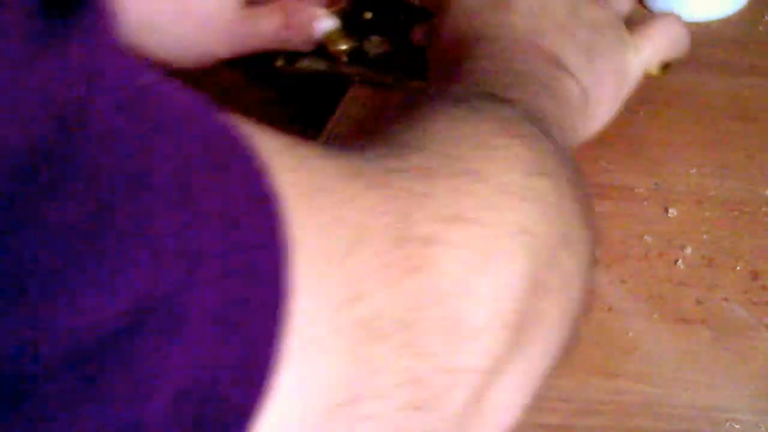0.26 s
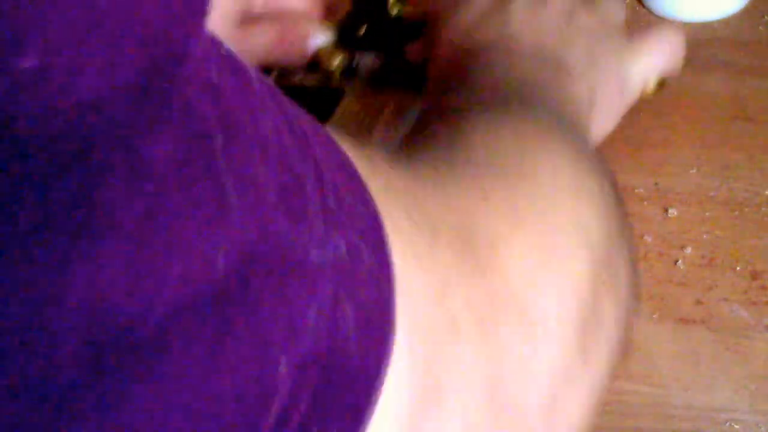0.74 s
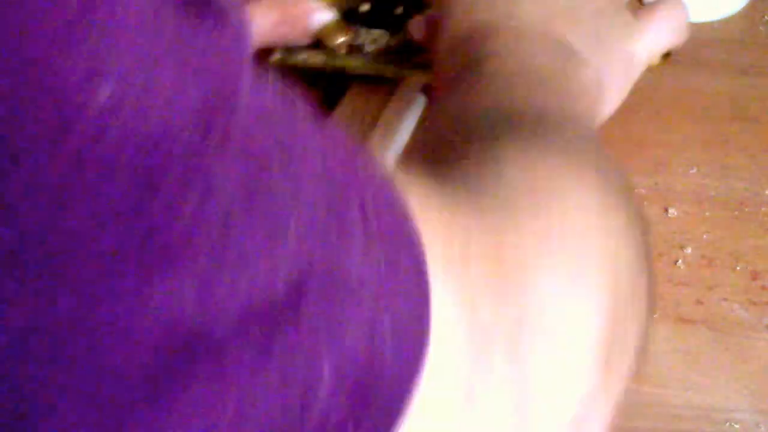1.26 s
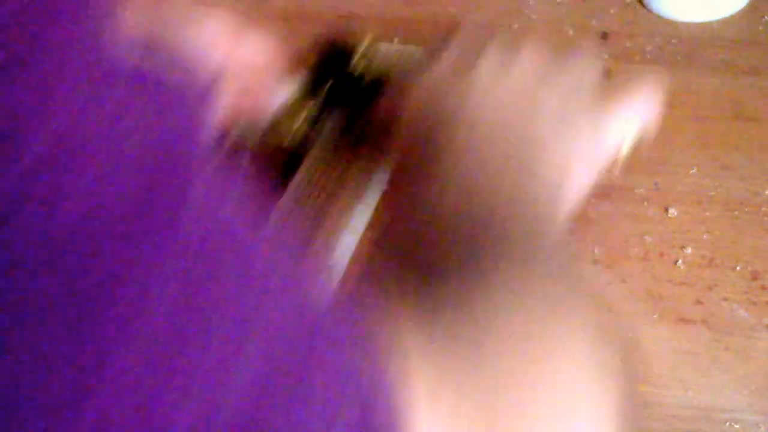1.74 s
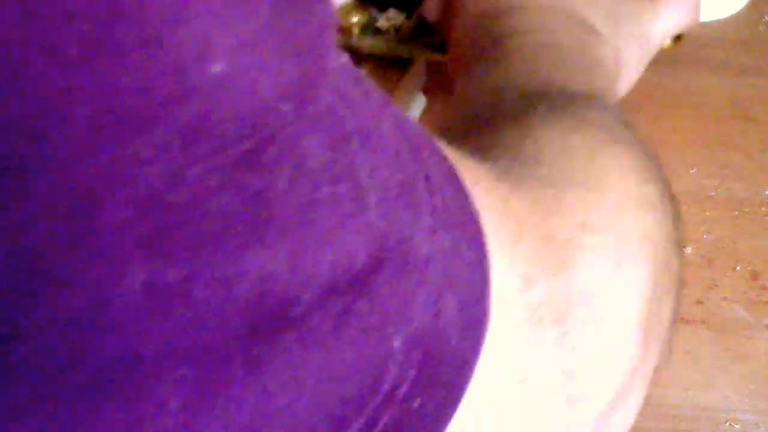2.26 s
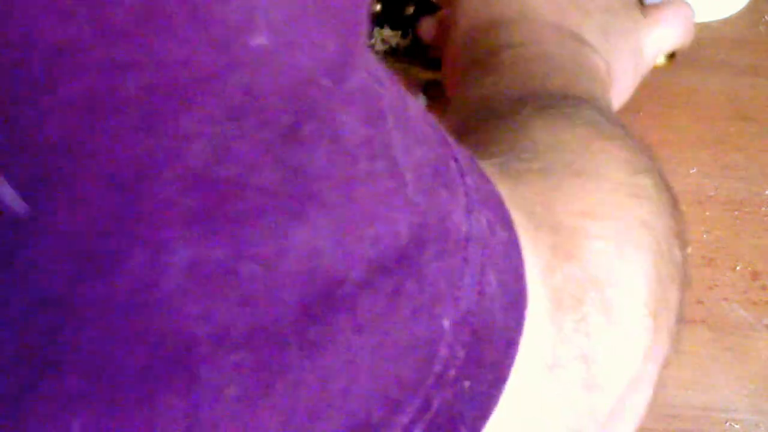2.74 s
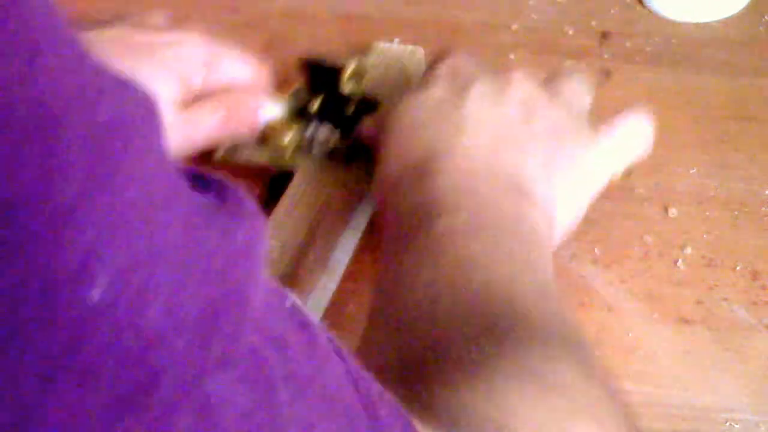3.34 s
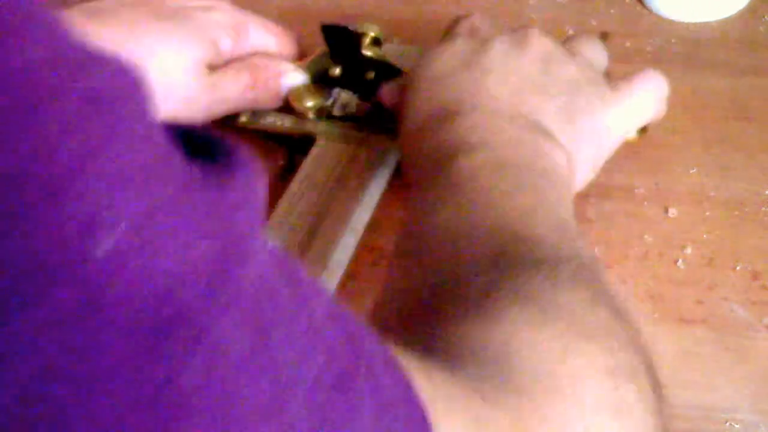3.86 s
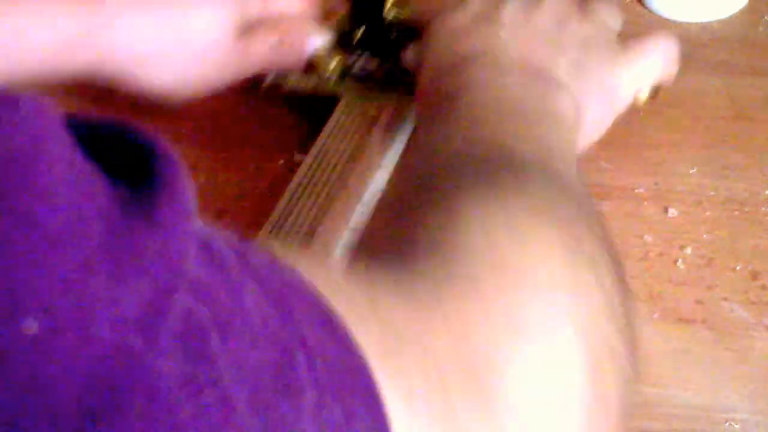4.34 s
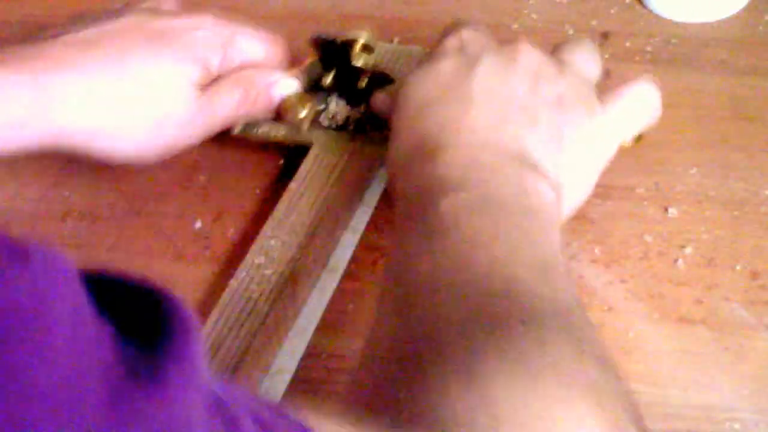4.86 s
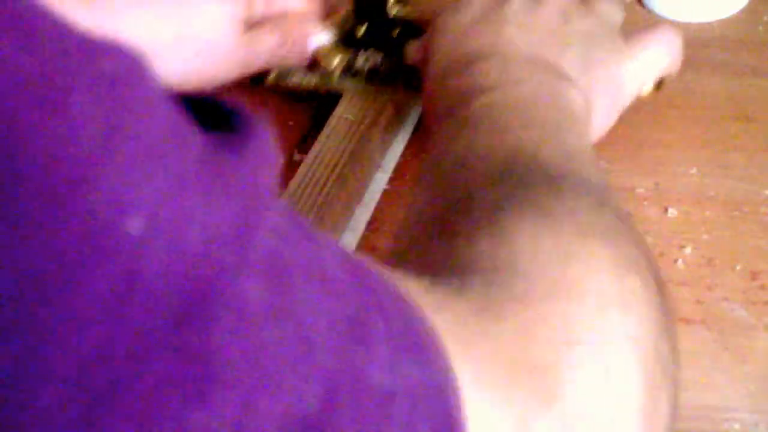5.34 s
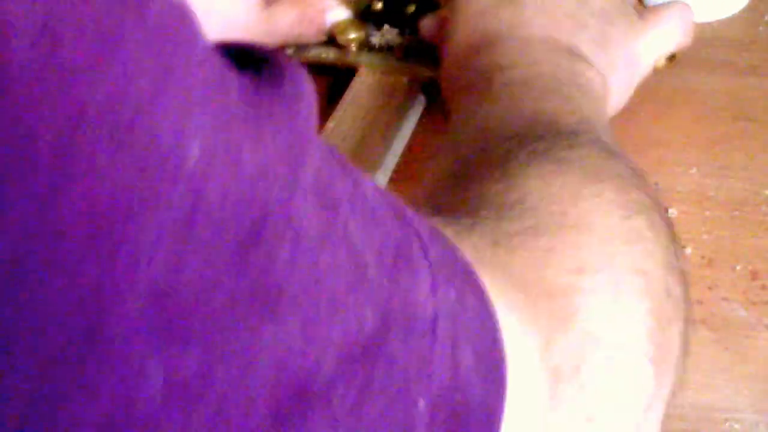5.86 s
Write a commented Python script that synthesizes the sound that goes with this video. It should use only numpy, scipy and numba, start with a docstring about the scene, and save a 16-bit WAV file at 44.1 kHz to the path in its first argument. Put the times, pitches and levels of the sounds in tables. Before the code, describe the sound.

Separate, uneven scraping strokes on wood, heard close, with faint background hiss in the gaps. Two strong rasps come first with hard woody knocks and short groans; after a pause and small steel clicks, another stroke leads into a stuttering squeal. A further scrape ends in a loud metallic snap, then shorter, brighter scrapes and dull thumps continue with a short room ring.

```python
"""Scraping a strip of wood

A small steel scraper is pushed along a strip of wood held on a workbench, in a small room that rings.
Filtered noise makes the hiss of the sole, uneven grains tear the fibres, and slips make the bench judder.
Sudden contacts excite the bench and the steel as knocks and clicks; wavering sines hum, groan and squeal.
Once the blade chatters and squeals, once it catches with a snap."""
import sys
import numpy as np
from scipy import signal
from scipy.fft import rfft, irfft
from scipy.io import wavfile
from scipy.ndimage import uniform_filter1d
from numba import njit

SR = 44100
rng = np.random.default_rng(int(sys.argv[2]) if len(sys.argv) > 2 else 0)


def output_pcm(signal):
    """Save a mono or channel-first signal as 16-bit PCM at the path in sys.argv[1].

    Samples are clipped to [-1, 1] before scaling.
    """
    pcm = np.clip(np.atleast_2d(signal).T, -1, 1) * 32767
    wavfile.write(sys.argv[1], SR, np.round(pcm).astype(np.int16))


N = 269010  # length in samples
TIME = np.arange(N) / SR  # seconds


def undb(db):
    """Decibels to gain."""
    return 10 ** (np.asarray(db) / 20)


def unit(x):
    """Scale to rms 1."""
    return x / np.sqrt(np.mean(x ** 2))


def join(tables, column):
    """Draw one column of several tables as a continuous curve over time."""
    rows = np.vstack(tables)
    return np.interp(TIME, rows[:, 0], rows[:, column])


def loudness(tables):
    """Gain from the dB column of each table, silent between them."""
    inside = sum((TIME >= rows[0][0]) & (TIME <= rows[-1][0]) for rows in tables)
    soft_gate = uniform_filter1d(np.minimum(inside, 1.), size=128)
    return soft_gate * undb(join(tables, 1))


def envelope(start, rise, length, fade_db_per_s):
    """Rise, hold until the length is over, then fade evenly in dB."""
    age = TIME - start
    fade_db = -fade_db_per_s * np.clip(age - length, 0, 2)
    return np.clip(age / rise, 0, 1) * undb(fade_db)


def ring(x, response):
    """Pass a sound through an impulse response."""
    return signal.fftconvolve(x, response)[:len(x)]


def colour(points, size=2048):
    """Causal response of unit energy with the given spectrum."""
    hz, db = np.transpose(points)
    bins = np.log(np.fft.rfftfreq(size, 1 / SR) + 1)
    log_gain = np.log(undb(np.interp(bins, np.log(hz), db)))
    # folding the cepstrum forward in time puts the energy at the start
    cepstrum = irfft(log_gain)[:size // 2]
    cepstrum[1:] *= 2
    response = irfft(np.exp(rfft(cepstrum, size)))
    return response / np.linalg.norm(response)


@njit
def svf(x, hz, width):
    """State-variable band-pass whose centre and width may move."""
    y, band_state, low_state = np.empty(len(x)), 0., 0.
    for i in range(len(x)):
        g = np.tan(np.pi * min(hz[i] / SR, .45))
        k = width[i] / hz[i]
        v = (band_state + g * (x[i] - low_state)) / (1 + g * (g + k))
        band_state = 2 * v - band_state
        low_state += 2 * g * v
        y[i] = k * v
    return y


def band(x, hz, width):
    """One resonance, gain 1 at its centre."""
    steady = np.zeros(len(x))
    return svf(x + 1e-18, hz + steady, width + steady)


def walk(rate):
    """Smooth chance with rms 1, drawn anew about rate times per second."""
    hold = max(int(SR / rate), 1)
    steps = np.repeat(rng.standard_normal(N // hold + 1), hold)
    return unit(uniform_filter1d(steps, hold)[:N])


def grains(rate, spread_db):
    """Tiny fractures at random moments and of very uneven size."""
    happens = rng.random(N) < rate / SR
    sign = rng.choice([-1, 1], N)
    size = undb(spread_db * np.minimum(rng.exponential(size=N), 4))
    return unit(happens * sign * size)


def slips(rate, uneven):
    """Stick and slip: the phase of each cycle, and a pulse where it lets go."""
    phase = np.cumsum(rate * np.exp(uneven * walk(170)) / SR) % 1
    lets_go = np.diff(phase, prepend=0) < 0
    return phase, lets_go * undb(4.1 * walk(300))


def add(track, s, sound, db):
    """Place a sound at a time with the given peak level."""
    start = int(s * SR)
    scaled = sound * undb(db) / np.abs(sound).max()
    track[start:start + len(sound)] += scaled[:N - start]


# how long the room rings at each pitch: pitch_hz, time_to_fall_60_db_s
ROOM_DECAY = [(150, 0.5), (400, 0.32), (1000, 0.28), (2500, 0.4), (5000, 0.18), (10000, 0.12)]


def room(x, wet_db, size=26000):
    """Dense reflections of a small room, with its own dying time for each range of pitch."""
    t, hz = np.arange(size) / SR, np.fft.rfftfreq(size, 1 / SR)
    centres, t60s = np.transpose(ROOM_DECAY)
    noise = rfft(rng.standard_normal(size))
    shares = [np.interp(np.log(hz + 1), np.log(centres), row) for row in np.eye(len(ROOM_DECAY))]
    tail = sum(irfft(noise * share) * undb(-60 * t / t60) for share, t60 in zip(shares, t60s))
    tail *= np.minimum(t / 0.0037, 1)
    return x + undb(wet_db) * ring(x, tail / np.linalg.norm(tail))


# colour of the background hiss and of the swish: pitch_hz, level_db (per Hz)
AIR_SPECTRUM = [(18, -95), (30, -28), (174, -4.5), (204, 1.5), (372, -5), (510, -1), (699, -4.5), (885, -5),
                (2810, -7.5), (3120, -7.5), (4620, -14.5), (5130, -9), (6670, -21), (10400, -25),
                (15900, -38)]
STILL_DB = -51  # background hiss


def air():
    """Faint background noise whose level slowly wavers."""
    hiss = unit(ring(rng.standard_normal(N), colour(AIR_SPECTRUM)))
    return hiss * undb(STILL_DB + 3.3 * walk(11))


# low notes of the bench that hum: pitch_hz, level_db (relative to the drive)
HUM_NOTES = [(132, -10), (267, -9.5), (343, -11)]
HUM_SKIP_DB, HUM_KNOCK_DB = -15.5, -37  # drive by the skipping blade, and most that a knock can give
HUM_FADE_DB_PER_S = 157


def hum():
    """Pushes, skips and knocks leave the low resonances of the bench humming."""
    drive = sum(undb(judder_db - 4) * envelope(start, rise, length, HUM_FADE_DB_PER_S)
                for start, rise, length, _, _, judder_db, _, _ in PUSHES_ALONG)
    drive += sum(undb(db + HUM_SKIP_DB) * envelope(start, rise, length, fade)
                 for start, rise, length, db, _, fade in SKIP_RUNS)
    from_knocks = [undb(HUM_KNOCK_DB) * envelope(s, 0.0094, 0.08, HUM_FADE_DB_PER_S) * min(undb(db + 19.5), 1)
                   for s, db, *_ in BLOWS]
    drive += np.max(from_knocks, axis=0)
    notes = 0
    for hz, db in HUM_NOTES:
        angle = 2 * np.pi * np.cumsum(hz * (1 + 0.0252 * walk(70))) / SR
        notes += undb(db + 2.74 * walk(14)) * np.sin(angle)
    return drive * notes


# the strip sticks and groans at one note of the bench:
# start_s, length_s, pitch_hz (about which it wavers), level_db (before 2.5 dB of gain and the flutter)
GROAN_NOTES = [(0.347, 0.13, 133.3, -36.5), (0.387, 0.15, 229.4, -41.5), (0.919, 0.18, 633.3, -26),
               (1.801, 0.16, 268.8, -24), (3.04, 0.12, 149.3, -26.5), (3.182, 0.13, 266, -21.5),
               (3.64, 0.18, 133.7, -32), (3.775, 0.116, 341.6, -20.5), (4.471, 0.094, 347.6, -26),
               (5.537, 0.11, 261.6, -23)]


def groans():
    """Stick-slip feeds one bench resonance for a moment; its pitch and strength waver."""
    out, drift, flutter = np.zeros(N), walk(70), undb(3.8 * walk(60))
    for start, length, hz, db in GROAN_NOTES:
        span = slice(int(start * SR), int((start + length) * SR))
        angle = 2 * np.pi * np.cumsum(hz * (1 + 0.022 * drift[span])) / SR
        swell = signal.windows.tukey(len(angle), .6)
        out[span] += undb(db + 2.5) * swell * flutter[span] * np.sin(angle)
    return out


# notes of the steel blade and tool body: pitch_hz (about which it shifts), width_hz, level_db (relative)
BLADE_NOTES = [(1065, 50, 6), (1404, 87, -6.5), (1573, 114, -1.5), (1850, 61, -1), (2243, 59, 5.5),
               (2745, 33, -28), (3487, 47, -2), (4430, 73, 0), (4650, 50, 0.5), (5320, 88, -10)]


def blade(x, ring_db):
    """The steel adds its resonances, which shift a little with the grip and the load."""
    modes = 0
    for hz, width, db in BLADE_NOTES:
        mode = undb(db) * band(x, hz * (1 + 0.03 * walk(12)), width)
        modes += mode * undb(2.86 * walk(14))
    return unit(unit(x) + undb(ring_db) * unit(modes))


# the tool is drawn back lightly:
# start_s, length_s, swish_db, drag_db (blade on wood), hiss_db (sole)
DRAWS_BACK = [(-0.1, 0.4, -49, -73, -64), (1.078, 0.26, -50.5, -56.5, -59), (2.043, .8, -48, -67, -89),
              (4.55, 0.39, -48.5, -56, -80), (4.93, .17, -47.5, -40, -53), (5.612, 0.16, -56, -35.5, -56)]
# colour of the blade dragged backwards: pitch_hz, level_db (per Hz)
DRAG_SPECTRUM = [(59, -59), (100, -38), (118, -10), (184, -34), (257, -7.5), (345, -2.5), (462, -11),
                 (764, -15), (814, -15.5), (2370, -15.5), (2800, -22.5), (9070, -29.5), (15000, -38)]
RETURN_RISE_S, RETURN_FADE_DB_PER_S = .08, 128


def returns():
    """Drawing the tool back gives a noise swish, fine grains where the blade rubs, and a sole hiss."""
    swish = unit(ring(rng.standard_normal(N), colour(AIR_SPECTRUM))) * undb(0.45 * walk(9))
    rubbing = ring(grains(rate=6000, spread_db=2.0), colour(DRAG_SPECTRUM))
    drag = blade(rubbing, ring_db=-7) * undb(2 * walk(30))
    hiss = unit(ring(rng.standard_normal(N), colour(SOLE_SPECTRUM)))
    out = np.zeros(N)
    for start, length, swish_db, drag_db, hiss_db in DRAWS_BACK:
        mix = undb(swish_db) * swish + undb(drag_db) * drag + undb(hiss_db) * hiss
        out += mix * envelope(start, RETURN_RISE_S, length, RETURN_FADE_DB_PER_S)
    return out


# notes of the bench with the strip on it: pitch_hz, level_db (relative), time_to_fall_60_db_s
BENCH_NOTES = [(131.15, -10.5, 0.37), (148.3, -22, 0.41), (185.4, -10.5, 0.4), (232, -16, 0.9),
               (265.6, -3, 0.31), (328, -17, 0.6), (348.3, -2.5, 0.18), (379.6, 5, 0.066),
               (440.5, -7, 0.15), (495, -4.5, 0.14), (538, -13, 0.085), (603, 0.5, 0.17),
               (615.7, -15.5, 0.1), (666, -11, 0.29), (687, -2, 0.056), (810, -33, 0.039),
               (1057, -14.5, 0.21), (1104, -20, 0.2)]
# colour of the dull thud: pitch_hz, level_db (per Hz)
THUD_SPECTRUM = [(70, -26), (130, -11), (300, 3.5), (500, 0.5), (720, 0), (950, -9.5), (1400, -19),
                 (3000, -37), (8000, -67)]


def bench_response(ring_db, size=24000):
    """A dull thud together with the ringing modes of the bench."""
    t = np.arange(size) / SR
    modes = sum((-1) ** k * undb(db - 60 * t / t60) * np.sin(2 * np.pi * hz * t)
                for k, (hz, db, t60) in enumerate(BENCH_NOTES))
    thud = colour(THUD_SPECTRUM)
    return np.pad(thud, (0, size - len(thud))) + undb(ring_db) * modes / np.linalg.norm(modes)


# tool and strip knock on the bench: start_s, peak_db (before 0.5 dB of gain),
# crack_db (treble, before 3 dB of gain), thump_db (gain of the thump), thump_pitch_hz
BLOWS = [(0.353, -21, -9.5, 10.5, 215), (0.8194, -7, 0, 11, 600), (0.9302, -5, -4, 7, 595),
         (1.3607, -24.5, -9.5, -15, 400), (1.4335, -11.5, -14, -1, 636), (1.6474, -11, -21.5, 0, 364),
         (1.8056, -5, -8, 6, 646), (2.2569, -21, -16, 9, 324), (2.5763, -11, -16, -2, 570),
         (2.8961, -19.5, -18, -1, 880), (3.052, -13, -6, 12, 220), (3.1421, -6.5, -20, 4, 517),
         (3.221, -14.5, -25, 8, 330), (3.409, -21, 5, 9, 800), (3.7834, -12, -17, 7, 920),
         (3.824, -11.5, -21, 8, 420), (4.244, -22, -18, 24, 214), (4.5064, -14.5, -15, 8.5, 325),
         (4.647, -33.5, -23, 12, 700), (5.3635, -14.5, -18, 12, 340), (5.5411, -7.5, -21, 6, 443),
         (6.048, -9, -15.5, 8, 810)]
# colour of the crack of a hard contact: pitch_hz, level_db (per Hz)
CRACK_SPECTRUM = [(300, -48), (800, 8), (1300, 12), (2000, 8), (3200, 2), (4600, -4), (6500, -21),
                  (10000, -21), (15000, -36)]


def knocks():
    """Each blow rattles briefly and rings the bench, with a thump set by where it lands; hard contact cracks."""
    out, bench = np.zeros(N), bench_response(ring_db=0)
    t = np.arange(len(bench)) / SR
    impulse = signal.unit_impulse(len(t))
    for s, db, hard_db, thump_db, thump_hz in BLOWS:
        rattle = impulse + 0.14 * np.exp(-t / 0.0073) * rng.standard_normal(len(t))
        blow = impulse + 0.053 * np.exp(-t / 0.0079) * rng.standard_normal(len(t))
        body = ring(blow, bench)
        thump = undb(thump_db) * band(body, thump_hz, .5 * thump_hz)
        crack = undb(hard_db + 3.0) * ring(rattle, colour(CRACK_SPECTRUM))
        add(out, s, body + thump + crack, db + 0.5)
    return out


# steel clicks on wood: start_s, peak_db, pitch_hz, width_hz (of the first of two filters)
STEEL_CLICKS = [(2.6897, -13.5, 1420, 1600), (2.6922, -16.5, 2200, 1120), (3.4227, -11, 1630, 605),
                (3.425, -2.5, 1660, 1190), (4.119, -1, 2470, 6160), (4.1204, -13, 5160, 9000),
                (4.1254, -20, 4800, 9020), (4.1372, -34, 5980, 9080)]


def clicks():
    """Short, hard contacts of the steel edge: an impulse and a puff of noise, filtered twice."""
    out, t = np.zeros(N), np.arange(2048) / SR
    for s, db, hz, width in STEEL_CLICKS:
        puff = 0.12 * np.exp(-t / 0.0024) * rng.standard_normal(len(t))
        contact = signal.unit_impulse(len(t)) + puff
        add(out, s, band(band(contact, hz, width), hz, 2 * width), db)
    return out


# the blade skips: start_s, rise_s, length_s, level_db (before a 4.5 dB cut), tick_db, fade_db_per_s
SKIP_RUNS = [(3.44, .018, 0.096, -14, -25, 230), (3.593, 0.033, 0.081, -15.5, -28.5, 167),
             (4.117, 0.0026, 0.0078, -11, -19.5, 750), (4.135, 0.027, 0.056, -19.5, -42, 203)]
# colour of the skipping blade: pitch_hz, level_db (per Hz)
SKIP_SPECTRUM = [(80, -24), (150, -7), (330, 2), (500, -2), (720, 2), (1200, -9.5), (1700, -0.5),
                 (2500, -8.5), (3200, -3), (4000, -3.5), (4700, -3.5), (5600, -10), (8000, -17),
                 (15000, -49)]
SKIPS_PER_S = 145  # roughly, as the pace is uneven
TICKING_SHARE = 0.67  # of a run of skips; then the blade lifts and only the scrape goes on


def chatter():
    """The blade skips over the grain, with a bright tick at every release; its bending modes follow the squeal."""
    phase, _ = slips(rate=SKIPS_PER_S, uneven=.17)
    skipping = (0.85 + np.exp(-phase / 0.19)) * grains(rate=6000, spread_db=2.5)
    scrape = blade(ring(skipping, colour(SKIP_SPECTRUM)), ring_db=-2)
    bend_hz = join(SINGING, 1)
    bending = unit(band(scrape, bend_hz, 540) + 0.36 * band(scrape, 2 * bend_hz, 370))
    tick_noise = (0.077 + np.exp(-phase / 0.24)) * rng.standard_normal(N)
    ticks = unit(ring(tick_noise, colour(SOLE_SPECTRUM)))
    body = undb(-4.5) * unit(scrape + 0.41 * bending)
    out = np.zeros(N)
    for start, rise, length, db, tick_db, fade in SKIP_RUNS:
        out += undb(db) * body * envelope(start, rise, length, fade)
        out += undb(tick_db) * ticks * envelope(start, rise, TICKING_SHARE * length, fade)
    return out


# the blade sings, one list for each squeal:
# time_s, pitch_hz (before wobble), level_db (before 1 dB of gain and flutter), roughness (0 is pure)
SINGING = [
    [(3.432, 2049, -30, 0.4), (3.447, 1932, -12.5, 0.72), (3.47, 1885, -33, 0.86), (3.54, 2034, -26, 1),
     (3.585, 2380, -16.5, 0.4), (3.602, 2254, -13.5, 0), (3.625, 2396, -24, 0.94), (3.73, 2553, -27, 1.14)],
    [(4.123, 2280, -32, 0.76), (4.17, 2210, -30.5, 0.68), (4.25, 2185, -38.5, 0.54), (4.35, 2215, -49, 0.3)],
]


def squeal():
    """Friction locks on to a bending mode of the blade: a tone with overtones, ragged but briefly pure."""
    hz, rough = join(SINGING, 1), join(SINGING, 3)
    angle = 2 * np.pi * np.cumsum(hz * (1 + 0.129 * rough * walk(700))) / SR
    overtones_db = [0, -10.5, -22, -21, -44]
    tone = sum(undb(db) * np.sin(k * angle) for k, db in enumerate(overtones_db, start=1))
    flutter = undb(4.4 * rough * walk(280) + 1.0)
    time_and_level = [np.array(rows)[:, ::2] for rows in SINGING]
    return unit(tone) * flutter * loudness(time_and_level)


# the tool is pushed along the strip; rasp, judder and hiss get a fixed trim below:
# start_s, rise_s, length_s, rasp_db, rasp_centre_hz, judder_db, hiss_db, hiss_swell_db_per_s
PUSHES_ALONG = [(0.767, 0.038, 0.26, -28, 2130, -29, -36, 13),
                (1.645, 0.049, 0.28, -26.5, 2200, -21.5, -37.5, 21),
                (3.012, 0.037, 0.21, -27.5, 2550, -24.5, -36, -11),
                (3.771, 0.053, 0.12, -24.5, 3690, -20, -37.5, -17),
                (4.375, .08, 0.13, -24, 4650, -26.5, -37.5, 8),
                (5.356, 0.0096, 0.18, -26.5, 3350, -23, -36, 76),
                (6.037, 0.044, .06, -25.5, 1400, -21.5, -37, 42)]
# the blade digs in during a push, with the same trims:
# start_s, length_s, rasp_db, rasp_centre_hz, judder_db
DIGS_IN = [(0.814, 0.013, -24.5, 1510, -12), (0.919, 0.12, -21, 2210, -16), (1.798, 0.13, -21.5, 1440, -15),
           (3.049, 0.017, -25, 2700, -29), (3.141, 0.058, -41, 1570, -13.5),
           (3.779, 0.012, -24, 1090, -14.5), (5.528, 0.015, -22.5, 2230, -16)]
# colour of the tearing fibres: pitch_hz, level_db (per Hz)
FIBRE_SPECTRUM = [(300, -25), (700, -4), (1100, 2.5), (2000, -2), (3500, 0.5), (5300, -1), (6400, -4.5),
                  (9000, -19), (15000, -54)]
# colour of the sliding sole: pitch_hz, level_db (per Hz)
SOLE_SPECTRUM = [(1000, -38), (3000, -8), (4700, 0.5), (6500, -5.5), (8100, 0.5), (10300, -0.5),
                 (11500, -7), (13000, -16.5), (14000, -17), (15500, -34)]
# narrow notes of the sliding sole: pitch_hz (about which it wavers), width_hz, level_db (relative)
SOLE_NOTES = [(3500, 51, -11), (4870, 70, -7), (8070, 120, 8), (8570, 73, 7), (10230, 99, -3),
              (13500, 140, 16)]
BITE_RISE_S = 0.0034
# how fast each part dies away once the push stops
RASP_FADE_DB_PER_S, JUDDER_FADE_DB_PER_S, HISS_FADE_DB_PER_S = 190, 204, 284
WHISTLE_HZ, WHISTLE_DB = 8170, -14.5  # middle pitch and level (relative to the hiss) of the free sole
BITE_DAMPS_DB = -2.5  # the hiss sinks while the blade is dug in


def strokes():
    """Uneven slips shake the bench and tear fibres in bursts; the sole hisses, and whistles unless dug in."""
    phase, jolts = slips(rate=130, uneven=.55)
    release = np.exp(-phase / 0.36)
    bursts = (0.6 + release) * undb(1.3 * walk(60))
    shaking = unit(jolts) + 0.43 * grains(rate=1500, spread_db=4.5)
    judder = unit(ring(shaking, bench_response(ring_db=-1.5)))
    tearing = bursts * grains(rate=5000, spread_db=2.5)
    fibres = blade(ring(tearing, colour(FIBRE_SPECTRUM)), ring_db=-4.0)

    sole = unit(ring(bursts * grains(rate=6700, spread_db=5.0), colour(SOLE_SPECTRUM)))
    singing = sum(undb(db + 2.0 * walk(12)) * band(sole, hz * (1 + 0.0043 * walk(9)), width)
                  for hz, width, db in SOLE_NOTES)
    dug_in = sum(envelope(start, BITE_RISE_S, length, HISS_FADE_DB_PER_S) for start, length, *_ in DIGS_IN)
    dug_in = np.minimum(dug_in, 1)
    whistle = unit(band(sole, WHISTLE_HZ * (1 + 0.028 * walk(12)), 160))
    whistle = (1 - dug_in) * whistle * undb(1.9 * walk(16))
    hiss = unit(sole + 0.16 * unit(singing) + undb(WHISTLE_DB) * whistle)
    hiss = hiss * undb(BITE_DAMPS_DB * dug_in)
    grain = np.exp(0.079 * walk(25))  # the wood's grain shifts the rasp up and down

    def cut(start, rise, length, rasp_db, rasp_hz, judder_db):
        """The edge tears fibres and shakes the bench."""
        rasp = unit(0.091 * fibres + unit(band(fibres, rasp_hz * grain, 1.29 * rasp_hz)))
        torn = undb(rasp_db - 3.5) * rasp * envelope(start, rise, length, RASP_FADE_DB_PER_S)
        shaken = undb(judder_db - 7.5) * judder * envelope(start, rise, length, JUDDER_FADE_DB_PER_S)
        return torn + shaken

    out = sum(cut(start, BITE_RISE_S, *bite) for start, *bite in DIGS_IN)
    for start, rise, length, rasp_db, rasp_hz, judder_db, hiss_db, swell in PUSHES_ALONG:
        swell_db = swell * (np.clip(TIME - start, 0, length) - length / 2)
        out += cut(start, rise, length, rasp_db, rasp_hz, judder_db)
        out += undb(hiss_db + swell_db + 3.5) * hiss * envelope(start, rise, length, HISS_FADE_DB_PER_S)
    return out


LEFT_DB = 1.2  # left channel above the right


def scene():
    """Scraping, blows and background, a little stronger on the left."""
    scraping = room(strokes() + chatter() + squeal(), wet_db=-9.5) + room(groans() + hum(), wet_db=-12.5)
    blows = room(knocks(), wet_db=-6.5) + room(clicks(), wet_db=-7)
    sides = undb(np.array([[LEFT_DB], [-LEFT_DB]]) / 2)
    return (scraping + blows + returns() + air()) * sides


TOP_HZ = 15700  # hardly anything is heard above this


def record(dry):
    """Thin the deep bass, round the peaks and cut the top."""
    thin = signal.sosfilt(signal.butter(2, 85, "high", fs=SR, output="sos"), dry)
    rounded = np.tanh(thin)
    return signal.sosfilt(signal.ellip(8, .2, 70, TOP_HZ, fs=SR, output="sos"), rounded)


dry = scene()
out = record(dry)
output_pcm(out)
```